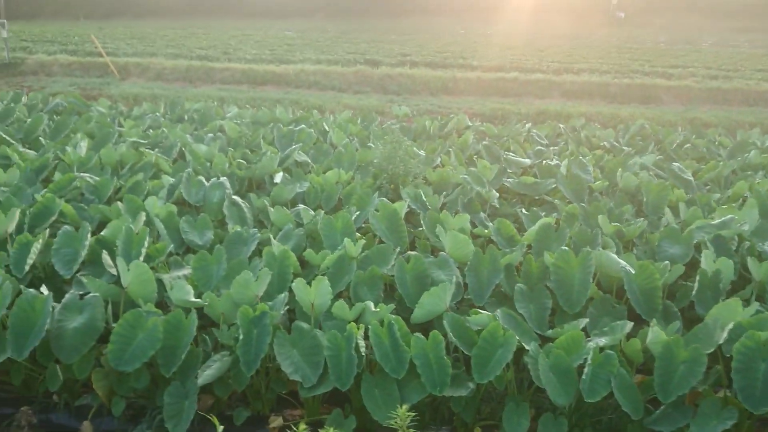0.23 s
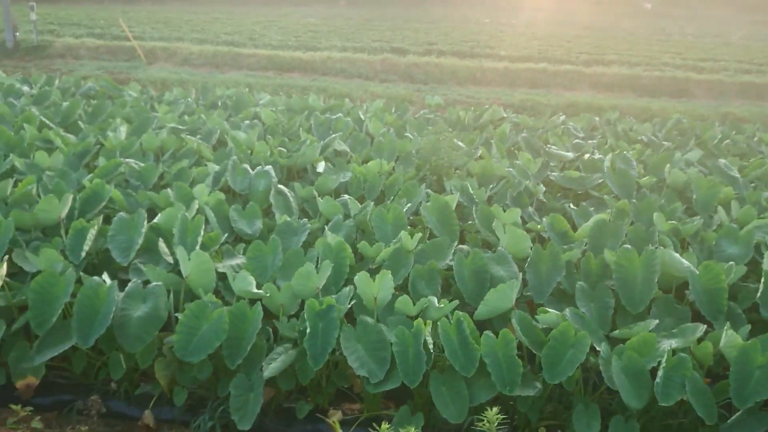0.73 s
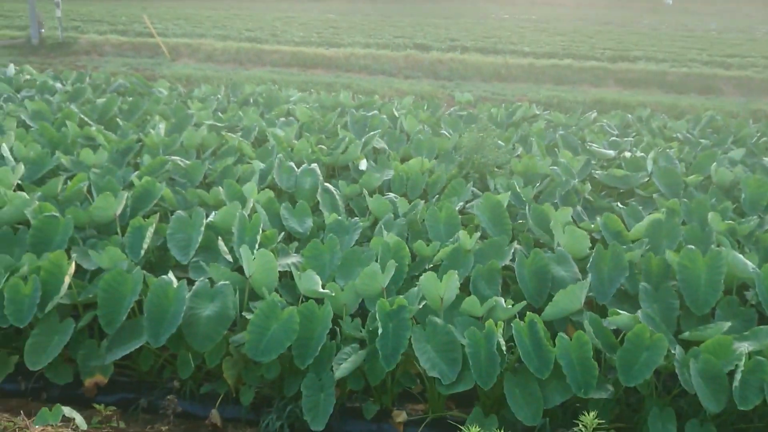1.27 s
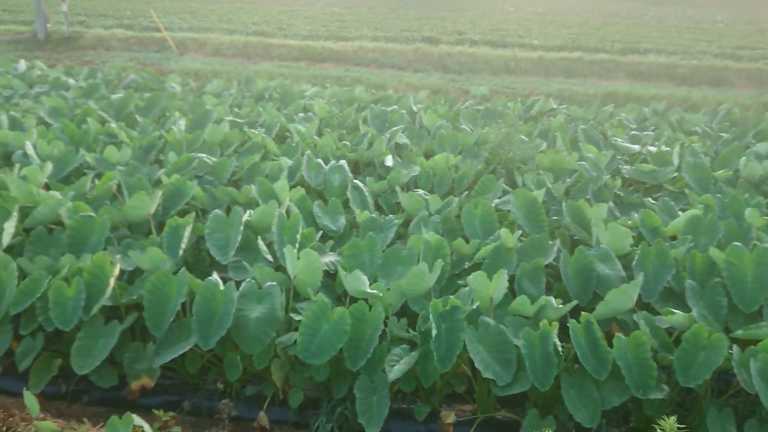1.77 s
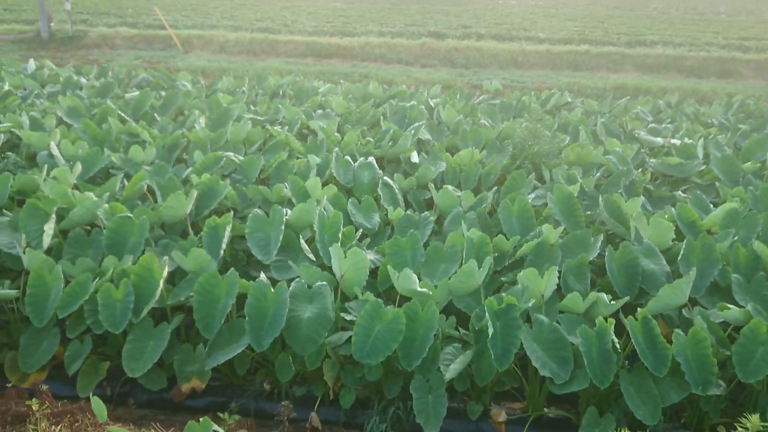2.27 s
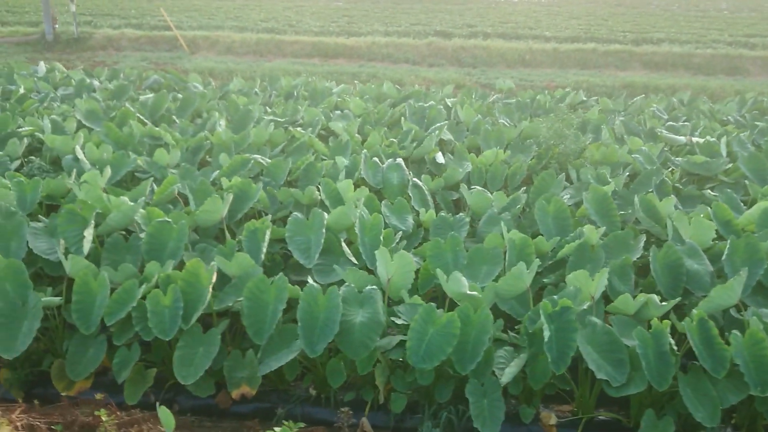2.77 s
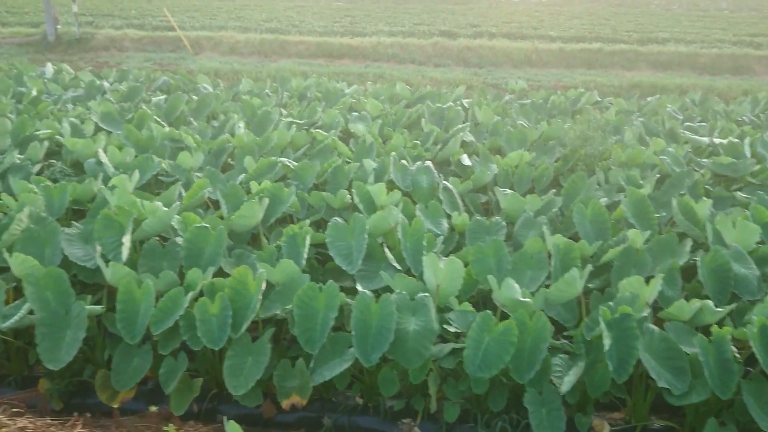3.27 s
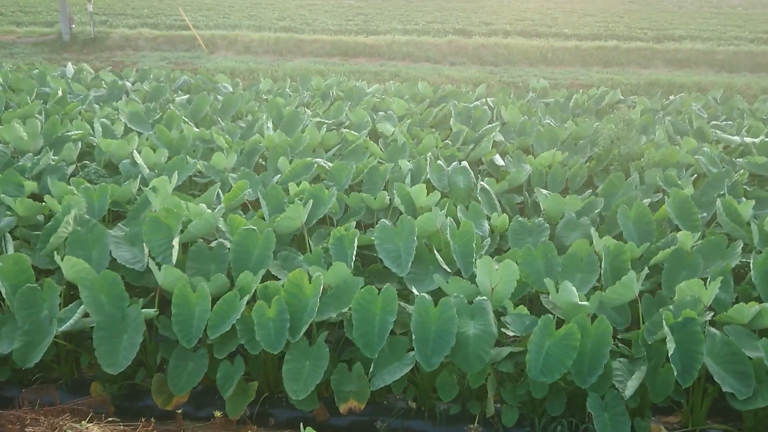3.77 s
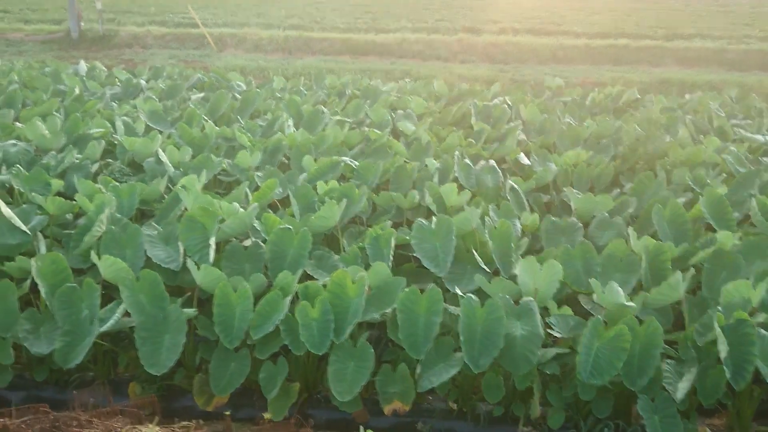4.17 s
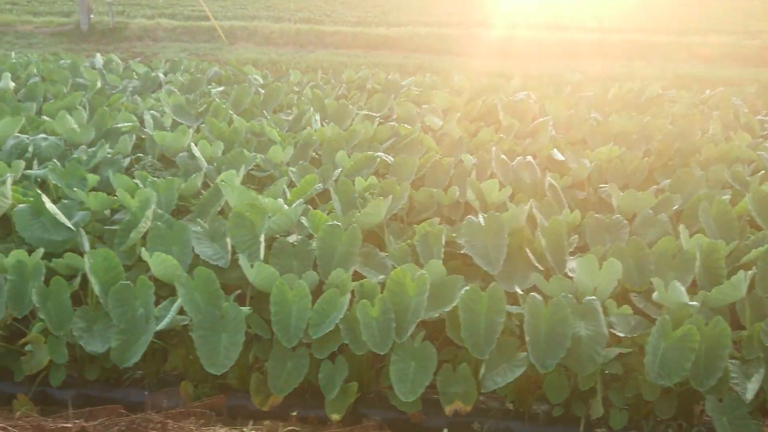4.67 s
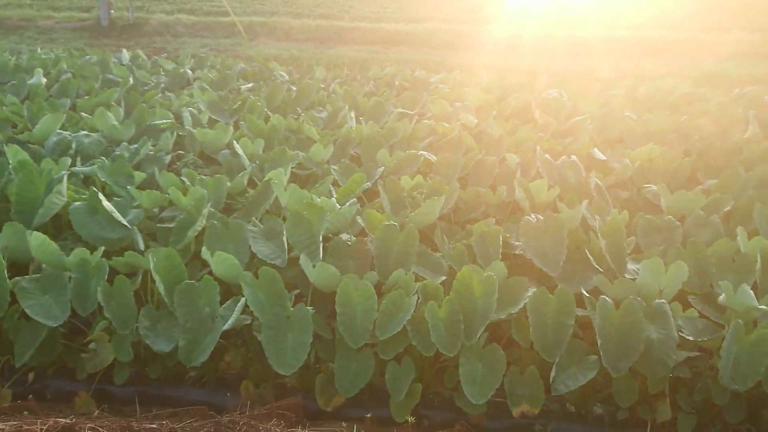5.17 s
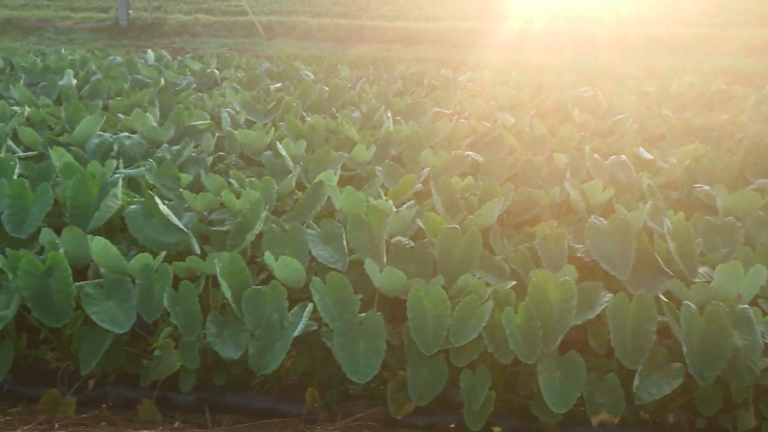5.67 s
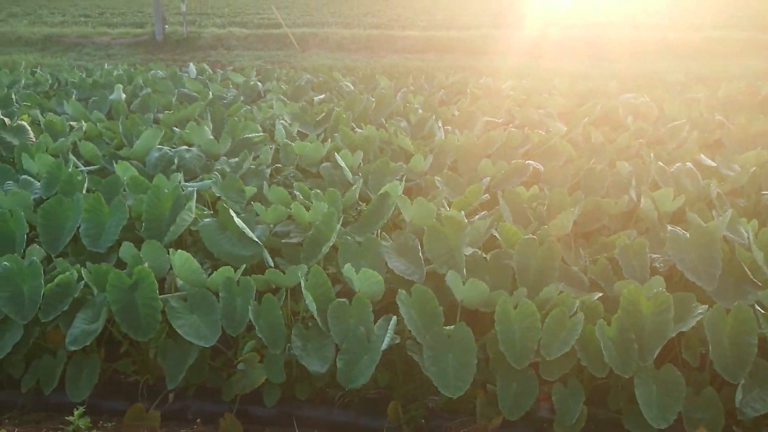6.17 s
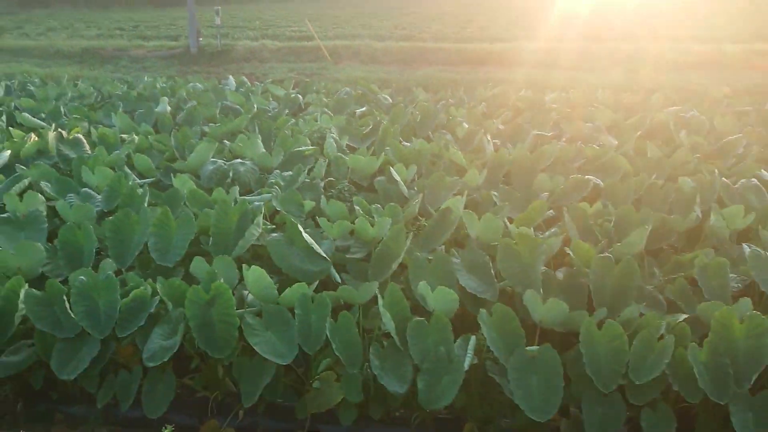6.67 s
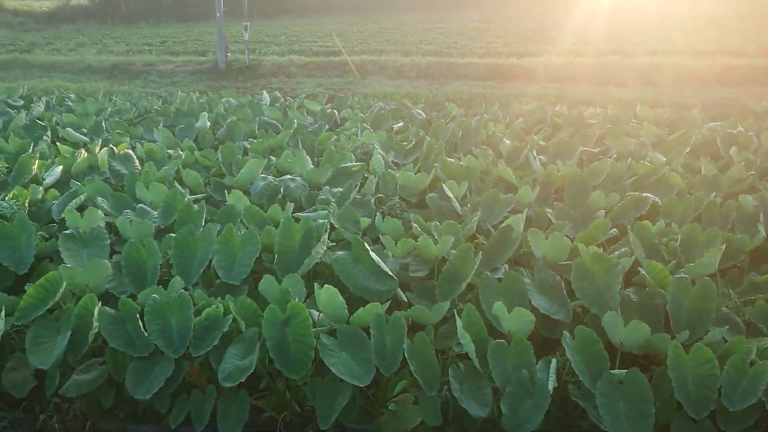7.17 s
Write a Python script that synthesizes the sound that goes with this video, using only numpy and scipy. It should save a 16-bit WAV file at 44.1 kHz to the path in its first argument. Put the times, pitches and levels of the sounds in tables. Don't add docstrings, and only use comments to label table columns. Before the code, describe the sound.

A steady high cicada chorus hisses over a leafy crop field while shoes crackle through dry soil and stalks, with katydids rasping on the left.

```python
import sys
import numpy as np
from scipy import signal
from scipy.fft import rfft, irfft
from scipy.io import wavfile
from scipy.ndimage import map_coordinates

SR = 44100
rng = np.random.default_rng(int(sys.argv[2]) if len(sys.argv) > 2 else 0)


def voltage_ratio(level):
    return 10 ** (np.asarray(level, float) / 20)


def master_out(mix):
    frames = np.transpose(np.atleast_2d(mix))
    ceiling = np.clip(frames, -1, 1)
    pcm = np.round(ceiling * 32767).astype(np.int16)
    wavfile.write(sys.argv[1], SR, pcm)


N = 326996
T = np.arange(N) / SR

# frequency in Hz, level in dB per Hz.
CHORUS_COLOUR = [(2650, -54), (4500, -64), (5200, -19.5), (5670, -6), (6020, -24), (6180, 6), (6720, -4.5),
                 (7980, 4), (8980, -13), (9790, -16), (11500, -31.5), (15000, -59), (22000, -120)]


def colour(points, hz):
    f, db = np.transpose(points)
    return np.interp(np.log(np.maximum(hz, 1)), np.log(f), db)


def unit(x):
    return x / np.sqrt(np.mean(x ** 2))


def unit_peak(x):
    return x / np.abs(x).max()


def shape(x, points):
    log_gain = colour(points, np.fft.rfftfreq(4096, 1 / SR)) * np.log(10) / 20
    cep = np.fft.irfft(log_gain)
    cep[1:2048] *= 2
    cep[2049:] = 0
    response = irfft(np.exp(rfft(cep)))[:2048]
    return signal.fftconvolve(x, response)[:len(x)]


def ring(x, hz, width_hz):
    return signal.lfilter(*signal.iirpeak(hz, hz / width_hz, SR), x)


def walk(rate):
    levels = rng.standard_normal(int(N / SR * 100) + 2)
    place = T[::32] * rate
    step = place.astype(int)
    part = place - step
    blend = part ** 2 * (3 - 2 * part)
    return 1.15 * np.interp(T, T[::32], levels[step] + blend * (levels[step + 1] - levels[step]))


def grains(share, scatter_db):
    chance = rng.random((3, N))
    size = voltage_ratio(-scatter_db * np.log(chance[2] + 1e-4))
    return unit((chance[0] < share) * np.sign(chance[1] - .5) * size)


def pan(x, db):
    return x * voltage_ratio(np.outer([.5, -.5], db))


def chorus():
    # time in seconds, level in dB, low singers and high singers in dB against that level,
    # left minus right in dB.
    swells = [
        [(0.0, -34, -11.5, -3.5, -13), (0.56, -36.5, -8.5, -6, -13), (2.4, -36.5, -8, -8.5, -13),
         (3.9, -36.5, -4.5, -16.5, -14), (5.32, -38.5, -3.5, -12, -14), (6.5, -38, -5.5, -7.5, -15)],
        [(6.56, -35.5, -9, -5, -13), (6.98, -39.5, -11, 2, -16), (7.41, -36, -13.5, -9.5, -11)],
    ]
    s, *columns = np.vstack(swells).T
    level_db, low_db, high_db, pan_db = (np.interp(T, s, c) for c in columns)
    blur = np.array([grains(.3, 0.81) for _ in range(2)])
    out = 0
    for k, hz in enumerate(5150 * 1.06 ** np.arange(14)):
        tymbal = signal.butter(2, [hz * .962, hz * 1.038], "band", fs=SR)
        group = unit(signal.lfilter(*tymbal, np.roll(blur, 9973 * k, axis=1)))
        low = np.clip((7650 - hz) / 600, 0, 1)
        high = np.clip((hz - 8200) / 700, 0, 1) * (hz < 9500)
        db = colour(CHORUS_COLOUR, hz) + low * (low_db + 6.0) + high * (high_db + 15.5)
        db = db + 0.8 * walk(2.87) + 1.27 * walk(12)
        side_share = np.interp(hz, [5800, 6380, 7750, 8730, 9440, 10000], [0.034, 0.97, 1.02, 1.47, 0.033, 0.1])
        side_db = pan_db * side_share + 0.55 * walk(1.55)
        out = out + group * voltage_ratio(db + np.outer([.5, -.5], side_db))
    return out * voltage_ratio(level_db - 6.0)


def crowd(level_db=-45.5, climb=.025, waver=0.00321, count=130):
    hush_s, hush_below_hz = 6.54, 7900
    out, shake, flicker = np.zeros((2, N)), walk(90), 1.4 * walk(40) + 2 * walk(5.)
    lowest, highest = [-1.5, .6, 7300, -15, -3, 0], [7.2, 1.8, 9250, -4, 0, 6]
    for s, length, hz, side_db, db, lead in rng.uniform(lowest, highest, (count, 6)):
        on = np.arange(max(int(s * SR), 0), min(int((s + length) * SR), N))
        x = (T[on] - s) / length
        own = (on + int(lead * SR)) % N
        bend = 1 + climb * x * min(max(s, 0) / 3, 1) + waver * shake[own]
        phase = 2 * np.pi * np.cumsum(hz * bend) / SR
        tone_db = level_db + db + 0.48 * colour(CHORUS_COLOUR, hz) + flicker[own]
        tone = np.sin(phase + [[0], [lead]]) * np.sin(np.pi * x) * voltage_ratio(tone_db)
        singing = (hz > hush_below_hz) | (T[on] < hush_s)
        out[:, on] += pan(tone * singing, side_db)
    return out


def singers(throb_hz=26.98, throb=0.3):
    # start and stop in seconds, first and last pitch in Hz, top level in dB.
    places = [
        (-14, .0045, 3, [(4.4, 6.45, 6560, 7015, -34)]),
        (-14, .004, .5, [(2.7, 6.0, 6200, 6510, -43), (1.0, 3.0, 8350, 8500, -43), (2.8, 4.7, 8400, 8550, -42), (3.6, 4.7, 7800, 7950, -40), (4.4, 5.9, 8500, 8580, -46), (6.3, 7.6, 8060, 8100, -42)]),
        (-9, .0035, 1.1, [(3.6, 5.0, 7050, 7720, -38), (5.0, 6.2, 7700, 7830, -46), (2.4, 4.2, 6400, 6860, -43), (4.0, 5.95, 6800, 7570, -40), (5.5, 6.7, 8200, 8250, -39), (6.1, 6.55, 7120, 7230, -41), (0, 1.2, 8700, 8750, -43), (3.0, 4.0, 6400, 6620, -42)]),
        (16, .004, 1.1, [(5.5, 6.54, 5240, 5265, -54), (4.9, 7.9, 5060, 5205, -55), (2.0, 3.3, 9100, 9300, -57)]),
    ]
    swell_share, swell_db, sag_db, stop_s = .55, -12, -6, .06
    out = np.zeros((2, N))
    chance = np.array([walk(90), 3 * walk(2.6), 1.1 * walk(80) + 0.53 * walk(2.7)])
    for pan_db, waver, bend, songs in places:
        for start, stop, first_hz, last_hz, db in songs:
            on = np.arange(int(start * SR), min(int(stop * SR), N))
            shake, drift, flicker_db = chance[:, (on + rng.integers(N)) % N]
            x = (T[on] - start) / (stop - start)
            hz = first_hz + (last_hz - first_hz) * np.expm1(-bend * x) / np.expm1(-bend)
            phase = 2 * np.pi * np.cumsum(hz * (1 + waver * shake)) / SR
            beat = 1 + throb * np.sin(2 * np.pi * throb_hz * T[on] + drift)
            level_db = db + np.interp(x, [0, swell_share, 1], [swell_db, 0, sag_db]) + flicker_db
            ends = np.clip(np.minimum(T[on] - start, stop - T[on]) / stop_s, 0, 1)
            tone = np.sin(phase + np.array([[0], [rng.uniform(1, 1.1)]]))
            out[:, on] += pan(tone * beat * ends * voltage_ratio(level_db - 2.5), pan_db)
    return out


def land():
    # frequency in Hz, level in dB per Hz.
    land_colour = [(15, -24), (25, -17.5), (65, 1.5), (205, -16), (293, -18), (350, -27.5), (427, -22),
                   (622, -48), (727, -34.5), (1580, -28), (2010, -24), (2570, -32.5), (4010, -32),
                   (5000, -32.5), (6500, -10.5), (11000, -120)]
    mid, *sides = (shape(rng.standard_normal(N), land_colour) for _ in range(3))
    surge = ring(rng.standard_normal((2, N)), 55.0, 14.0) * voltage_ratio(5.1 * walk(3.99))
    swell_db = .35 * walk(3)
    steady = unit(.5 * mid + np.array(sides)) * voltage_ratio(3.0 + swell_db)
    return voltage_ratio(-50.5) * (steady + unit(surge))


def steps(t60=0.0048, thud_t60=0.05, lag_s=.00004):
    # time in seconds, peak level in dB, ring in Hz, bright snap in dB against the peak.
    stalks, last_stalks = [(1.0354, -12, 1690, -5), (1.039, -12.5, 1940, -16), (1.0426, -29, 2000, -12),
                           (1.0472, -22, 1690, -6), (1.0548, -30, 1620, -6), (1.0582, -21, 1600, -7),
                           (1.0621, -17, 1890, 1), (1.0668, -20, 1850, -14), (1.0743, -20, 1390, -8),
                           (1.0793, -23.5, 1230, -7), (1.087, -16.5, 1600, -6), (1.0968, -15.5, 1790, -3),
                           (1.1041, -33, 1100, -5), (1.1113, -23, 840, -11), (1.1199, -25.5, 1720, -15),
                           (1.1291, -37, 1460, -1), (1.1385, -40, 1280, -10), (1.1459, -51, 940, -7),
                           (1.1506, -48, 1840, 1), (1.1549, -54, 1730, 4), (1.1643, -40.5, 1900, 11.5),
                           (1.1991, -30.5, 1090, -25), (2.2754, -28, 1820, 0), (2.2808, -32, 2110, -3),
                           (2.2861, -16.5, 1880, -6), (2.2981, -18.5, 1270, 1), (2.3033, -17.5, 940, -20),
                           (2.3073, -23, 1360, -7), (2.3133, -17.5, 1240, -11), (2.3216, -18.5, 1470, -13),
                           (2.3319, -27, 1610, -11), (2.3429, -30, 1690, -17), (2.351, -31, 1820, -17),
                           (2.3616, -37, 1650, -16), (2.3661, -46, 1630, -9), (2.3727, -38, 1280, -22),
                           (2.3791, -48, 1350, -9), (2.3831, -44, 1040, -13), (2.3957, -39, 1640, -16),
                           (2.4056, -46, 1520, -8), (2.4099, -44, 1350, -10), (2.4145, -36.5, 870, -15),
                           (2.4229, -49, 1070, -11), (2.4643, -28.5, 930, -36), (1.095, -16, 1950, -5),
                           (2.2945, -21.0, 1260, -3), (2.326, -21.0, 750, -19), (2.3365, -27.5, 1000, -10),
                           (1.0985, -22.5, 610, -15)], [(6.0034, -17.5, 1910, -1.5), (6.0244, -20, 2020, -3),
                                          (6.0413, -10.5, 2000, -9), (6.0468, -30, 1890, -14),
                                          (6.0532, -32, 1540, -12), (6.0599, -41, 1390, -13),
                                          (6.0642, -44, 1130, -11), (6.0709, -35, 1200, -17),
                                          (6.0763, -33, 1080, -11), (6.0799, -43, 1630, -9),
                                          (6.0889, -31, 1430, -10), (6.0948, -31, 1220, -16),
                                          (6.1044, -22, 1370, -8), (6.1121, -19, 1080, -5.5),
                                          (6.1165, -25, 1730, -16), (6.1203, -28, 1240, 5),
                                          (6.127, -27, 1600, 3), (6.1359, -38, 1480, 2),
                                          (6.1437, -28, 840, -7), (6.1514, -46, 840, 4),
                                          (6.1568, -44, 960, -8), (6.1981, -33, 1380, -29),
                                          (6.2079, -40, 1480, -20), (6.2157, -39, 670, -21),
                                          (6.0065, -20.0, 1030, -9), (6.0386, -18, 1650, -2),
                                          (6.0345, -24, 1580, -12)]
    clods, late_clods = [(0.0594, -33, 1480, -7.5), (0.2635, -39, 1890, 2), (0.2677, -42, 1930, -14),
                         (0.3051, -39, 1940, -1), (0.3214, -42.5, 1790, 4), (0.3654, -41, 1890, -2),
                         (0.5056, -43.5, 1040, -17), (0.5357, -42, 1880, -2), (0.5471, -47, 1420, 7),
                         (0.5512, -36.5, 1950, -9), (0.5683, -44, 1840, -2), (0.5952, -37.5, 1320, 1),
                         (0.6051, -39, 1810, -6), (0.6184, -49, 1900, -5), (0.6366, -41, 2260, 0),
                         (0.7213, -31.5, 2100, -10), (0.7257, -26, 2020, -25), (1.7584, -44, 830, -19),
                         (1.8088, -41.5, 1470, -19), (1.8167, -48, 1680, -17), (1.8786, -33, 1980, -21),
                         (1.9459, -39, 2000, -20), (2.4726, -41, 1360, -18), (2.4992, -40.5, 1650, -21),
                         (2.5719, -44, 1670, -16), (2.8984, -35, 1930, 2), (2.9023, -32.5, 2030, -3),
                         (2.9107, -36, 2180, -15), (2.9859, -31.5, 1260, -5.5), (3.0114, -38, 1840, -15),
                         (3.0186, -44, 1830, -11), (3.0234, -46, 1430, -8), (3.0306, -39, 1660, -11),
                         (3.0347, -36.5, 1840, -17), (3.1008, -37, 1460, -21), (3.1058, -43, 1730, -14),
                         (3.5383, -27, 1950, -13), (3.5478, -27.5, 1740, -7), (3.5586, -56, 1690, -15),
                         (3.5771, -34.5, 1830, -15), (3.6185, -33, 1780, -23), (3.6279, -38, 2030, -5),
                         (3.6372, -41, 1910, -15), (3.6556, -42, 1420, -14), (3.6608, -41, 1000, -11),
                         (0.237, -45, 1540, -18), (1.345, -47, 1500, 3), (1.36, -51, 1210, 3)], [(3.7206, -31, 990, -15), (3.7269, -45, 1720, 0),
                                        (3.7438, -46, 1770, -12), (3.8402, -39, 1710, -8),
                                        (4.2861, -40, 1320, -19), (4.2985, -43, 1870, -14),
                                        (4.3045, -44, 1420, -15), (4.3085, -43, 1840, -13),
                                        (4.3474, -45, 1980, -12), (4.3787, -41.5, 1610, 1),
                                        (4.4787, -37.5, 2120, -7), (4.8852, -42, 1850, -7),
                                        (4.9067, -40, 1740, -14), (4.9155, -35, 1630, -9),
                                        (4.9191, -38, 1830, -12), (4.9238, -39, 1140, -12),
                                        (4.9312, -43, 1210, -11), (4.973, -31.5, 1230, -22),
                                        (4.9781, -52, 1930, -12), (4.9931, -38, 1770, -21),
                                        (5.002, -32.5, 1400, -22), (5.0679, -45, 1810, -16),
                                        (5.0714, -43, 1800, -22), (5.0949, -32.5, 1820, -9),
                                        (5.5244, -32, 880, -23), (5.5467, -38, 1960, -18),
                                        (5.5522, -37, 2100, -11), (5.5558, -33.5, 1940, -18),
                                        (5.599, -36, 1390, -8), (5.6037, -34.5, 1470, -7),
                                        (5.6082, -32.5, 1920, -15), (5.6398, -40.5, 2220, 2),
                                        (5.6858, -36.5, 2060, -7), (6.238, -46, 1870, -12),
                                        (6.3056, -44, 1690, -8), (6.7505, -46, 1920, -13),
                                        (6.7645, -31.5, 2060, 6.5), (6.7714, -53, 1740, -7),
                                        (6.8165, -41, 2110, -9), (6.8203, -40, 1270, -13),
                                        (6.8346, -40.5, 1640, -9), (7.3558, -42, 1420, -16),
                                        (7.3784, -38, 1670, -17), (7.3881, -39.5, 820, -7),
                                        (7.3968, -44, 1400, -12), (6.728, -46, 900, -15)]
    # time in seconds, peak level in dB, pitch in Hz.
    heels, knocks = [(0.064, -29.5, 90), (0.655, -33.5, 99), (1.059, -28.5, 206), (1.29, -28.5, 83.5),
                     (1.811, -31.5, 82), (2.035, -33, 71.5), (2.307, -32, 340), (5.068, -34.5, 95),
                     (5.552, -27, 109), (6.109, -31.5, 173), (6.815, -26, 98)], [(1.874, -31.5, 424), (5.603, -27, 410), (6.216, -30.5, 460)]
    # landing time in seconds, roll length in seconds, grit level in dB as the shoe lands.
    footfalls = [(0.26, 0.37, -43.5), (0.508, 0.43, -45), (1.052, 0.35, -31.5), (1.76, 0.42, -44),
                 (2.272, 0.33, -30.5), (2.99, 0.3, -40), (3.54, 0.52, -44.5), (4.294, 0.29, -39),
                 (4.884, 0.31, -38.5), (5.538, 0.29, -39.5), (6.021, 0.45, -37), (6.734, 0.31, -41),
                 (7.364, 0.082, -40.5)]
    # frequency in Hz, level in dB per Hz.
    soil_colour = [(88, -76), (150, 5), (214, 3.5), (570, -1), (658, -2), (1250, -4), (1970, 0.5),
                   (2620, -1), (3740, -6), (5590, 0), (7000, 9), (9100, -2.5), (15400, -120)]
    out, t = np.zeros(N + 8000), np.arange(8000) / SR
    u = t[:1200]
    cracks = np.vstack([stalks, last_stalks, clods, late_clods])
    noise = rng.standard_normal((len(cracks), 2, 1200))
    click = 1. * (u == 0)
    soil = signal.lfilter(*signal.butter(2, [650, 2300], "band", fs=SR), shape(click, soil_colour))
    bursts = signal.fftconvolve(noise[:, 0] * np.exp(-u / 0.0022), soil[None], axes=1)[:, :1200]
    snaps = ring(ring(noise[:, 1] * np.exp(-u / 0.0014), 3760, 2100), 4680, 3300)
    dull = signal.butter(3, 2350, fs=SR)
    for (s, db, hz, snap_db), burst, snap in zip(cracks, bursts, snaps):
        body = np.sin(2 * np.pi * hz * u) * np.exp(-np.log(1000) * u / t60) + 0.14 * unit_peak(burst)
        rise = (1 - np.exp(-u * hz / 1.12)) ** 2
        body = unit_peak(signal.lfilter(*dull, body * rise))
        body = body + voltage_ratio(snap_db + 5.0) * unit_peak(snap)
        i = int((s - 0.0006) * SR)
        out[i:i + 1200] += voltage_ratio(db + 0.5) * body
    for s, db, hz in heels + knocks:
        i = int(s * SR)
        decay = np.exp(-np.log(1000) * t * np.sqrt(hz / 100) / thud_t60)
        rise = 1 - np.exp(-t / 0.0019)
        out[i:i + 8000] += voltage_ratio(db + 1.5) * np.sin(2 * np.pi * hz * t) * decay * rise
    landing_s, settle_db, lift_s = .01, -53, .06
    load = 0
    for s, length, db in footfalls:
        times = [s - landing_s, s, s + length, s + length + lift_s]
        load = load + voltage_ratio(np.interp(T, times, [db - 30, db, settle_db, settle_db - 8], -120, -120))
    clumps = load * voltage_ratio(3.9 * walk(90) - 7.0)
    grit = [unit(shape(grains(.12, 2.0), soil_colour)) * clumps for _ in range(2)]
    near = out[:N] + grit[0]
    late = map_coordinates(near, [(T - lag_s) * SR], mode="nearest")
    return np.array([near + grit[1], late - 0.047 * grit[1]])


def phrase(rows, numbers):
    stroke_ms, scatter_s, scatter_db = 12, .001, 1.6
    s, db = (np.interp(np.arange(numbers[-1] + 1), numbers, c) for c in np.transpose(rows))
    off = rng.standard_normal((len(s), 2)).T
    return np.transpose([s + scatter_s * off[0], stroke_ms + 0 * s, db + scatter_db * off[1]])


def strokes(rows, points, teeth, right_db):
    gate = np.zeros(N)
    for s, ms, db in rows:
        on = slice(int((s - .05) * SR), int((s + .07) * SR))
        x = (T[on] - s) / (ms * 0.00077) - .7
        swell = (np.minimum(x, 0) / 0.75) ** 2
        stop = (np.maximum(x, 0) / 0.25) ** 2
        gate[on] = np.maximum(gate[on], voltage_ratio(db) * np.exp(-swell - stop))
    file = [unit(shape(grains(teeth, 1.8), points)) for _ in range(2)]
    return np.array(file) * gate * voltage_ratio(np.array([[-2.5], [right_db]]))


def katydids():
    # time in seconds, left level in dB.
    phrases = [
        [(2.956, -50), (3.063, -38), (3.327, -37.5), (3.904, -32.5), (4.384, -33.5), (4.745, -40)],
        [(3.601, -45), (3.766, -36.5), (4.243, -35.5), (4.406, -32.5), (4.802, -30), (5.089, -31)],
    ]
    stroke_numbers = [
        [0, 2, 7, 17, 25, 31],
        [0, 3, 12, 15, 22, 27],
    ]
    # time in seconds, length in milliseconds, left level in dB.
    far_strokes = [(0.261, 14, -56), (0.295, 47, -55), (0.372, 11, -52), (0.709, 15, -53), (1.484, 14, -55),
                   (1.525, 12, -51), (5.133, 11, -53), (5.211, 7.3, -48), (5.246, 17, -46),
                   (5.297, 5.4, -46), (5.366, 15, -53), (5.401, 21, -50), (5.82, 23, -55), (5.865, 15, -54),
                   (5.906, 16, -49), (5.928, 12, -53), (6.357, 32, -59), (6.424, 19, -53), (6.459, 26, -51),
                   (6.523, 7, -50), (6.598, 12, -50), (6.636, 17, -46), (7.048, 13, -48), (7.08, 24, -49),
                   (7.199, 20, -51), (7.302, 30, -52)]
    # frequency in Hz, level in dB per Hz.
    near_colour, far_colour = [(5760, -39), (9800, -11), (10100, 8.5), (10900, 12), (13100, 9.5),
                               (14800, 10.5), (15500, 11), (16000, -21)], [(11000, -61), (12500, 2), (13600, -23), (14300, 4),
                                                       (15500, -15)]
    rows = np.vstack([phrase(*p) for p in zip(phrases, stroke_numbers)])
    near = strokes(rows, near_colour, 0.38, -21.0)
    tail = rng.standard_normal((2, 4000)) * np.exp(-np.arange(4000) / SR / 0.018)
    near = near + voltage_ratio(-31.5) * signal.fftconvolve(near, tail, axes=1)[:, :N]
    hiss = [unit(shape(rng.standard_normal(N), far_colour)) * voltage_ratio(db + 1.1 * walk(3.41)) for db in (-67, -72)]
    return near + strokes(far_strokes, far_colour, 0.33, -1.0) + hiss


def birds():
    # start in seconds, length in seconds, start and end pitch in Hz, level in dB.
    slide_rows = [(0.548, 0.039, 5100, 3900, -58), (0.778, .035, 4800, 3900, -58),
                  (0.884, 0.07, 4150, 5900, -47), (0.955, 0.035, 4100, 3260, -54),
                  (5.448, .035, 5050, 4330, -48), (5.585, .03, 3700, 4300, -53),
                  (6.31, 0.075, 3050, 4550, -56), (2.215, 0.085, 14600, 13450, -67),
                  (2.32, .035, 13000, 11700, -67), (2.215, .035, 12050, 11700, -69),
                  (1.895, .03, 13000, 11800, -69), (2.0, .09, 12550, 12900, -69)]
    # start in seconds,
    # length in seconds, turning pitch in Hz, fall after it in Hz, level in dB.
    arch_rows = [(0.51, 0.12, 3700, 950, -52), (5.645, .032, 5050, 850, -48), (5.83, 0.048, 4850, 750, -49),
                 (2.12, .05, 12250, -600, -69), (2.125, .045, 13950, -500, -72),
                 (7.23, .09, 12200, 1200, -66)]
    notes = []
    for s, length, first, last, db in slide_rows:
        middle = (first + last) / 2 - 0.16 * max(first - last, 0)
        notes.append((s, length, first, middle, last, db))
    for s, length, top, fall, db in arch_rows:
        first = top - (.2 if length > .1 else .85) * fall
        notes.append((s, length, first, top, top - fall, db))
    out = np.zeros((2, N))
    for s, length, *hz, db in notes:
        x = np.arange(int(length * SR)) / (length * SR)
        pitch = np.polyval(np.polyfit([0, .5, 1], hz, 2), x)
        phase = 2 * np.pi * np.cumsum(pitch) / SR
        note = np.sin(phase + np.array([[0], [2.6]])) * np.sin(np.pi * x) ** .5 * voltage_ratio(db - 0.5)
        i = int(s * SR)
        out[:, i:i + len(x)] += pan(note, 18. if hz[1] > 9000 else -1.5)
    tail = rng.standard_normal((2, 2000)) * np.exp(-np.arange(2000) / SR / 0.093)
    return out * voltage_ratio(2 * walk(90)) + voltage_ratio(-40) * signal.fftconvolve(out, tail, axes=1)[:, :N]


def buzz(rate_hz=120., duty=0.71, pan_db=21.5):
    # time in seconds, level in dB.
    loudness = [(2.4, -69), (3.3, -63), (3.9, -54), (4.35, -55), (4.7, -49.5), (5.1, -53.5), (5.6, -53.5),
                (5.8, -60)]
    # frequency in Hz, width in Hz, level in dB.
    modes = [
        (9310, 560, 3.5),
        (5860, 190, 0),
        (7710, 150, -7.5),
    ]
    phase = np.cumsum(rate_hz * (1 + .015 * walk(4.3)) / SR) % 1
    ribs = grains(0.94, 2.2) * np.exp(-phase / duty)
    body = sum(voltage_ratio(db) * unit(ring(ring(ribs, hz, w), hz, w)) for hz, w, db in modes)
    return pan(unit(body) * voltage_ratio(np.interp(T, *np.transpose(loudness), -120, -120)), pan_db)


def scene():
    return chorus() + crowd() + singers() + land() + steps() + katydids() + birds() + buzz()


def roll_off(x):
    return signal.sosfilt(signal.butter(12, 15870, fs=SR, output="sos"), x)


def record(dry):
    # frequency in Hz, left port minus right port in dB.
    port_gap = [(100, 1.5), (200, 7.5), (380, 11), (700, 3.5), (1300, 3), (2000, -16), (2600, 0.5),
                (4400, 2.5), (6000, 6), (16000, 14.5)]
    ports = [shape(x, np.array(port_gap) * [1, side]) for x, side in zip(dry, (.5, -.5))]
    bottom_cut = signal.butter(2, 38, "high", fs=SR, output="sos")
    top_cut = signal.ellip(10, .2, 80, 15800, fs=SR, output="sos")
    mix = signal.sosfilt(np.vstack([bottom_cut, top_cut]), ports)
    return roll_off(mix)


dry = scene()
out = record(dry)
master_out(out)
```